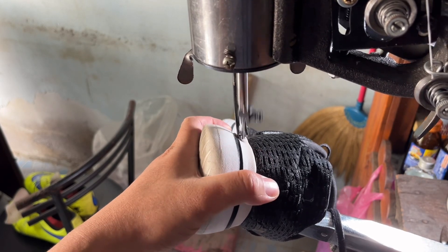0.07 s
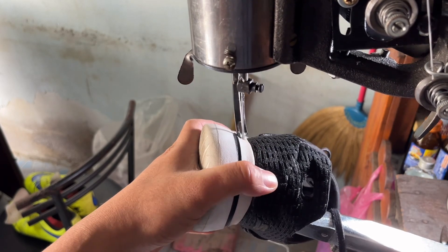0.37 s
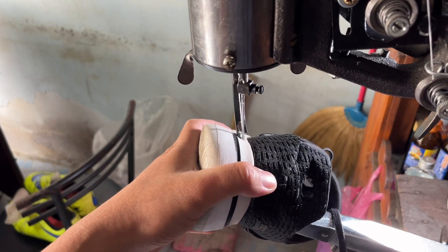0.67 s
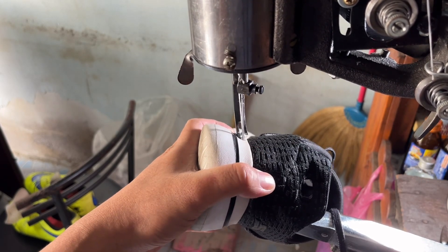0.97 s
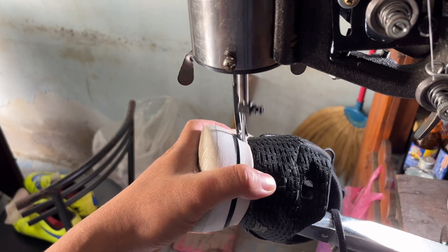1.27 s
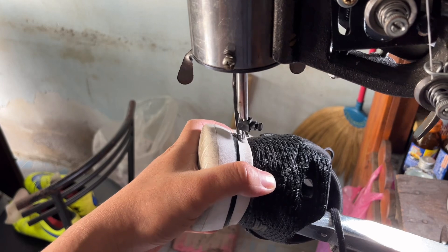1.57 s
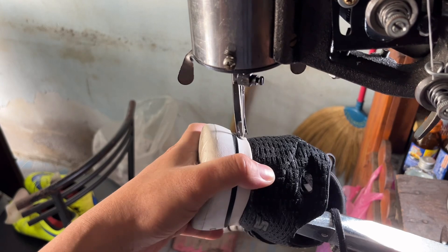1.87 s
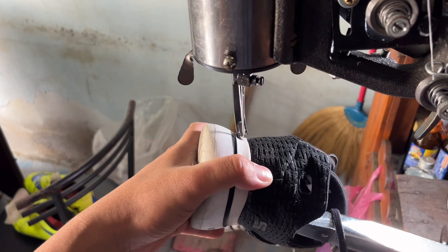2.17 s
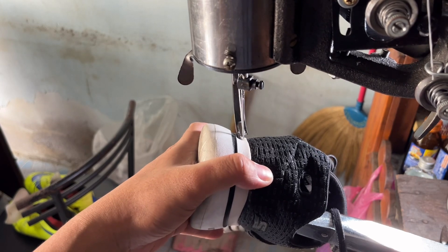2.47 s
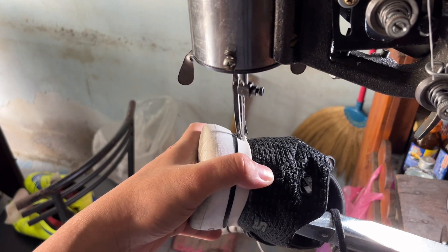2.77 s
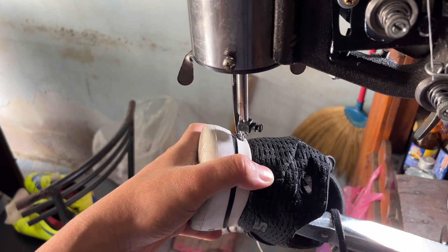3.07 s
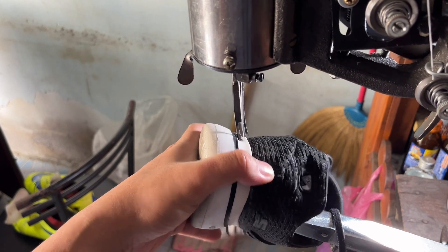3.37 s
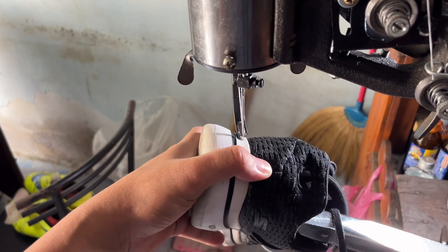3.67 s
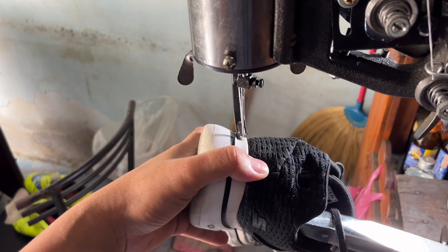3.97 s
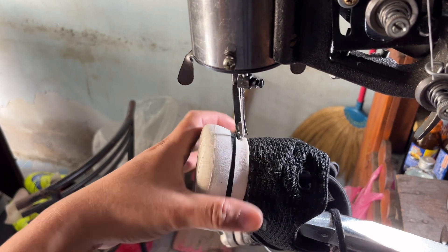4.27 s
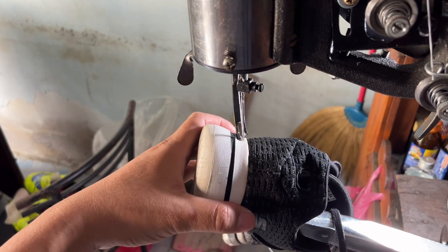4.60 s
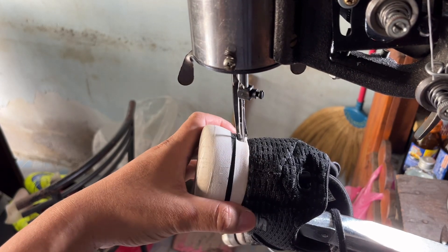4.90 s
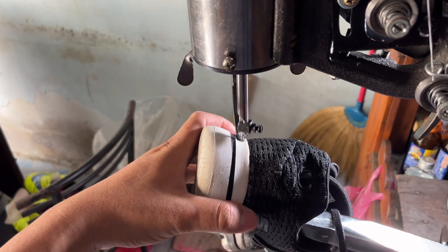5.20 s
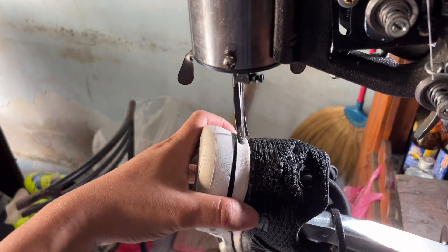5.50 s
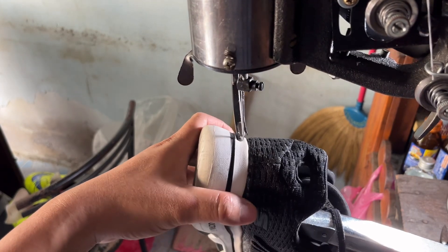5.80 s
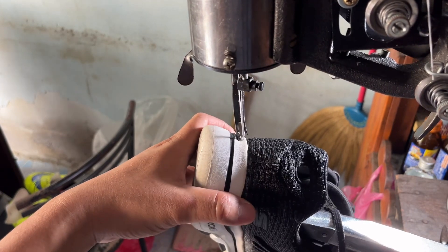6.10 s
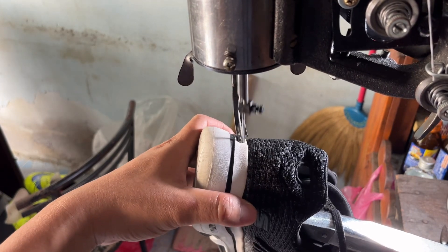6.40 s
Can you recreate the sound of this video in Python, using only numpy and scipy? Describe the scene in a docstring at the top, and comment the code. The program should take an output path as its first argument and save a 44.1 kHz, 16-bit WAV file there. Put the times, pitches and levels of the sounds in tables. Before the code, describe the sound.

A heavy sewing machine clacks through a shoe one slow stitch at a time, with small squeaks and faint traffic rumbling outside.

```python
"""Steel slides and squeaks, a lever snaps, a foot clacks down: a heavy cobbler's sewing machine,
close to the microphone in a small workshop, is turned by hand through a shoe, one stitch at a time.
In each stitch the linkage takes up its slack and the needle bar strikes, rattles and slides back.
The iron frame colours it all, the bench thumps, and fingers shift on the shoe between stitches.
Farther off, out in the street, traffic rumbles and an engine draws near."""
import sys
import numpy as np
from scipy import signal
from scipy.fft import rfft, irfft, next_fast_len
from scipy.io import wavfile
from scipy.ndimage import uniform_filter1d, map_coordinates

SR = 44100
rng = np.random.default_rng(int(sys.argv[2]) if len(sys.argv) > 2 else 0)


def wav_out(sig):
    """Save sig, one row per channel (or a flat mono array), as 16-bit PCM at SR to the path in sys.argv[1]."""
    wavfile.write(sys.argv[1], SR, np.round(np.clip(np.atleast_2d(sig).T, -1, 1) * 32767).astype(np.int16))


N = 293265

# One row a stitch: t/s of the needle bar's blow, run-up length/usual length, lever delay/s, foot delay/s,
# foot level/dB, foot's main ring f/Hz, its high ring level/dB, feed knock level/dB
STITCHES = [(-0.063, 1.7, 0.2435, 0.2963, -21, 4915, -5, -24.5),
            (1.4858, 0.965, 0.2428, 0.31, -45, 5480, 1, -25),
            (3.1288, 1.058, 0.24, 0.2977, -20.5, 5200, -11, -21.5),
            (5.2971, 1.057, 0.2432, 0.3022, -20, 5512, 12, -22.5),
            (6.6271, 0.972, 0.29, 0.24, -19, 5380, 0, -25)]
# Ring of the needle bar and linkage: f/Hz, level/dB, t60/s
BAR_MODES = [(1312, -12, .3), (2370, -10, .2), (2760, -7, .12), (3074, -10, .3), (3360, -7, .15),
             (3512, -8, .2), (3798, -2, .1), (4080, -5, .16), (5380, -1, .4), (5510, -8, .25),
             (6234, -13, .15), (7950, -7, .18), (11290, -11, .15), (12241, -14, .2)]
# Spectrum of a light steel contact: f/Hz, level/dB
TICK_COLOUR = [(300, -32), (700, -44), (2000, -3.5), (3500, -4), (5300, 2), (7500, -6), (11300, 3),
               (14000, 5.5), (16000, -17)]
# Stereo image of diffuse sound at the microphone: f/Hz, left-right likeness
DIFFUSE = [(60, 0.98), (130, 0.9), (290, 0.76), (640, -0.17), (1410, -0.29), (3100, 0.57), (6820, -0.099),
           (15000, 0.073)]


def needle_bar():
    """The bar strikes once a stitch, then rebounds and rattles as it drives through the sole."""
    colour = [(100, -26), (300, -13.5), (600, 12), (1000, 0.5), (1900, -1.5), (2700, 3), (3800, 4.5),
              (4600, 0), (6400, -1.5), (8400, -5), (10000, -6), (13500, -3), (15500, -34)]  # the crack: f/Hz, level/dB
    rebounds = [(1.5028, -15, 0.5), (1.5138, -17.5, -1.5), (1.5186, -15.5, -2), (1.528, -20.5, 5),
                (3.1457, -18, -2.5), (3.1575, -21.5, -6), (3.171, -28, 4), (5.3135, -18.5, -2),
                (5.326, -23, -2), (5.338, -25, 5.5), (6.6445, -16.5, 5)]  # t/s, level/dB, hardness/dB
    loaded_modes = [(2410, -7, .1), (2756, -4, .11), (3380, -8, .1), (3580, -6, .09), (3800, 0, .13),
                    (3875, -1, .12), (3945, -3, .09), (5400, -6, .12), (7150, -7, .07), (7950, -7, .08),
                    (11250, -8, .07)]  # the bar's ring under load: f/Hz, level/dB, t60/s
    blows = [(s, -17, 0) for s, *_ in STITCHES]  # t/s, level/dB, hardness/dB
    out = strikes(blows, colour, BAR_MODES,
                  tip_db=2.5, crack_t60=0.029, rattle_db=-14, rattle_t60=0.23, ring_db=-18)
    return out + strikes(rebounds, colour, loaded_modes,
                         tip_db=-7.5, crack_t60=0.017, rattle_db=-14, rattle_t60=0.13, ring_db=-10)


def feed_lever():
    """The feed lever snaps over once the needle is out."""
    colour = [(300, -26), (1500, 1), (3000, 4), (4200, 9.5), (5500, 6), (6600, 6.5), (8400, 3.5),
              (11600, 9.5), (14000, 9.5), (16000, -15)]  # the snap: f/Hz, level/dB
    modes = [(2080, -6, .035), (4310, -9, .02), (6200, -3, .022), (6310, -2, .025), (6900, -5, .025),
             (9290, -7, .03), (10300, -5, .03), (11550, 0, .035), (13020, -14, .1)]  # the lever's ring: f/Hz, level/dB, t60/s
    snaps = [(s + delay, -15.5, -1.5) for s, _, delay, *_ in STITCHES]  # t/s, level/dB, hardness/dB
    return strikes(snaps, colour, modes,
                   tip_db=-5, crack_t60=0.012, rattle_db=-24.5, rattle_t60=0.19, ring_db=-3.5)


def presser_foot():
    """Each landing rings the foot a little differently and shakes its spring; a softer bounce follows."""
    colour = [(200, -0.5), (600, -0.5), (1100, 0), (2200, 1), (3500, 0), (5200, 4.5), (6700, -2.5),
              (8400, -7), (11500, -1), (14000, -2), (15500, -49.5)]  # the clack: f/Hz, level/dB
    foot_modes = [(2045, 14.5, 0.078), (3376, 14.5, 0.069), (3614, 0, 0.071), (4046, 4, 0.094),
                  (4750, 10, .1), (5030, 1, .15), (5470, -3, 0.22), (6200, 8, 0.078), (7950, 2, 0.054),
                  (9367, -5, 0.056), (10100, -5, 0.25), (11800, 4, 0.2), (12620, -2, .09),
                  (13500, 8, 0.063)]  # the foot's ring: f/Hz, level/dB, t60/s
    spring_modes = [(3066, -9.5, .5), (3080, -9.5, .5), (10846, -20, .7)]  # its spring rings on: f/Hz, level/dB, t60/s
    out = np.zeros((2, N))
    for blow, _, _, delay, db, main_hz, high_db, _ in STITCHES:
        landing = blow + delay
        contacts = [(landing, db, 3), (landing + 0.017, db - 13.5, -7)]  # t/s, level/dB, hardness/dB
        modes = foot_modes + spring_modes + [(main_hz, 17, 0.1), (11300, high_db, 0.11)]
        out += strikes(contacts, colour, modes,
                       tip_db=-1.5, crack_t60=0.051, rattle_db=-10, rattle_t60=0.094, ring_db=-1.5)
    return out


def linkage():
    """The linkage ticks lightly and catches just before each blow; loose parts tick now and then."""
    ticks = [(-0.191, -52.5, 4), (0.196, -30.5, -5)]  # in every stitch: t/s from the blow, level/dB, hardness/dB
    stray_ticks = [(0.042, -38, -3.5), (0.382, -44.5, -3.5), (1.23, -50.5, 0), (1.619, -34, -7.5),
                   (1.805, -38, -29), (2.7475, -43.5, -4), (2.853, -53, -4), (3.2683, -26, -7),
                   (4.6338, -46, -6), (4.974, -50, 0), (5.456, -29.5, -2), (6.268, -52.5, 1),
                   (6.398, -52, 1.5)]  # loose parts: t/s, level/dB, hardness/dB
    catches = each_stitch([(-0.0843, -21.5, -7)])  # columns as for ticks
    out = strikes(each_stitch(ticks) + stray_ticks, TICK_COLOUR, BAR_MODES,
                  tip_db=-4, crack_t60=0.019, rattle_db=-10, rattle_t60=0.084, ring_db=-18)
    return out + strikes(catches, TICK_COLOUR, BAR_MODES,
                         tip_db=1, crack_t60=0.015, rattle_db=-14.5, rattle_t60=0.14, ring_db=-21)


def strikes(rows, colour, modes, tip_db, crack_t60, rattle_db, rattle_t60, ring_db):
    """Steel meets steel: a bright tip, a crack, a chatter of loose joints and the part's ring."""
    contact_s, tip_t60 = 0.00039, 0.013
    tilt = [(4000, -0.45), (10000, 1.0)]  # harder contact, more treble: f/Hz, dB per dB of hardness
    out, t = np.zeros((2, N)), np.arange(SR // 2) / SR
    for s, db, hardness_db in rows:
        chatter = amp(6.4 * unit(uniform_filter1d(rng.standard_normal(len(t)), size=60)))
        fall = amp(-60 * t / crack_t60) + amp(rattle_db - 60 * t / rattle_t60) * chatter
        hit = fall * close(noise(len(t)), colour) + amp(ring_db) * ring(modes, t)
        hit = filtered(hit, lambda hz: amp(hardness_db * along(tilt, hz)))
        tip = amp(tip_db - 60 * t / tip_t60) * close(noise(len(t)), TICK_COLOUR)
        add(out, s, amp(db) * (hit + tip) * (1 - np.exp(-t / contact_s)))
    return out


def ring(modes, t, scatter_db=5):
    """Damped modes, at new strengths for each hit; each reaches the two channels in its own phase."""
    hz, db, t60 = np.transpose(modes)[:, :, None]
    size = amp(db + scatter_db * rng.standard_normal(hz.shape))
    phase = rng.uniform(0, 2 * np.pi, hz.shape)
    phase = phase + np.array([-1, 1])[:, None, None] * rng.uniform(-np.pi / 5, np.pi / 5, hz.shape)
    partials = size * amp(-60 * t / t60) * np.sin(2 * np.pi * hz * t + phase)
    return partials.sum(axis=1) / np.linalg.norm(size)


def knocks(swell_s, t60, roughness, overtone_db):
    """The arm and the shoe give way under each push with a few low cycles that glide in pitch."""
    pushes = [(-0.13, -35, 674, -12), (0.001, -27.5, 465, 7), (0.038, -28.5, 499, -13),
              (0.053, -30, 214, 0)]  # arm and shoe: t/s from the blow, level/dB, f/Hz, glide/(octaves/s)
    punches = [(1.497, -19, 564, 7), (1.509, -20, 606, -4.5), (1.53, -21.5, 702.6, -9.5),
               (3.14, -18, 542, 8), (3.163, -23, 570, -7), (5.307, -19.5, 530, 9.5),
               (6.639, -22.5, 530, 19)]  # the needle breaks through: t/s, level/dB, f/Hz, glide/(octaves/s)
    sag = -19.5  # octaves/s, as the shoe is shoved on or struck by the foot
    feed = [(s + 0.26, db, 425, sag) for s, *_, db in STITCHES]
    under_foot = [(s + delay + 0.019, -16.5 + 0.33 * db, 449, sag) for s, _, _, delay, db, *_ in STITCHES]
    colour = [(60, -14), (150, -12.5), (400, -3), (700, -10.5), (1200, -18), (4000, -25.5), (12000, -91)]
    out, t = np.zeros((2, N)), np.arange(SR // 4) / SR
    shape = (1 - np.exp(-(t / swell_s) ** 2)) * amp(-60 * t / t60)
    for s, db, hz, glide in each_stitch(pushes) + punches + feed + under_foot:
        thud = close(noise(len(t)), colour)
        phase = 2 * np.pi * np.cumsum(hz * 2 ** (glide * t)) / SR
        tone = np.sin(phase) + amp(overtone_db) * np.sin(2.1 * phase)
        add(out, s, amp(db) * shape / shape.max() * (tone + roughness * thud))
    return out


def sliding(judder_db, grain_db, groan_db, groan_width_hz):
    """Bars and cams slide in tiny slips that scrape and hiss; under load the drive groans and judders."""
    scrape_colour = [(150, -22), (700, 8), (950, -12), (1280, -10), (1600, -25), (1870, 6), (2200, -1.5),
                     (3100, 8.5), (4100, 3), (4600, 2), (5400, 1.5), (7200, -4), (9000, -30), (15000, -48)]  # f/Hz, level/dB
    hiss_colour = [(4000, -49), (6500, -19), (8000, -23), (9500, -12.5), (11000, -5), (13800, -8.5),
                   (15500, -41)]  # f/Hz, level/dB
    groan_colour = [(100, 10), (500, -9.5), (850, -0.5), (1100, -14)]
    judder_colour = [(80, -12), (180, -3), (330, 1), (600, 1.5), (950, -7), (1300, 5), (1700, -5.5),
                     (2600, -11), (5000, -58), (12000, -55)]
    scrape_gain, hiss_gain, load, groan_hz = strokes(attack_s=0.0159, release_s=0.035)
    catching_db = 2.6 * wobble(110)
    slips = amp(grain_db * wobble(900) + catching_db)
    scrape = scrape_gain * close(slips * noise(N), scrape_colour)
    hiss = hiss_gain * close(slips * noise(N), hiss_colour)
    groan = close(narrow(groan_hz, groan_width_hz), groan_colour)
    judder = close(slips * noise(N), judder_colour)
    return scrape + hiss + load * (amp(groan_db) * groan + amp(judder_db) * judder)


def strokes(attack_s, release_s):
    """Each stroke sets in, holds and lets go: gains of scrape, hiss and groan, and the groan's pitch."""
    # Wheel starts, slack goes, needle drops, pierces, slides back, thread tightens, shoe feeds, foot
    # settles: start t/s and end t/s from the blow, scrape/dB, hiss/dB, groan/dB, groan f/Hz
    cycle = [ (-0.19, -0.154, -56, -60, -45.5, 540), (-0.125, -0.1, -49.5, -63, -36, 640),
             (-0.073, -0.028, -35.5, -41, -29, 613), (0.022, 0.048, -33, -37.5, -24.5, 589),
             (0.073, 0.127, -35.5, -43, -30, 590.8), (0.152, 0.206, -43.5, -53, -26.5, 630),
             (0.244, 0.277, -51, -60, -31.5, 448.2), (0.3, 0.324, -44.5, -80, -28.5, 457.5), ]
    t, gates = np.arange(N) / SR, []
    for begin, end, *_ in cycle:
        corners = [(begin - attack_s, 0), (begin, 1), (end, 1), (end + release_s, 0)]
        gates.append(np.interp(t, *np.transpose(each_stitch(corners))))
    gates, table = np.array(gates) + 1e-6, np.array(cycle)
    scrape, hiss, groan = np.sqrt(amp(table[:, 2:5].T) ** 2 @ gates ** 2)  # overlaps add in power
    return scrape, hiss, groan, table[:, 5] @ gates / gates.sum(axis=0)


def squeaks():
    """Dry bearings and thread stick and slip in brief squeals, some rising in pitch."""
    # t/s from the blow, half length/s, f/Hz, level/dB, rise/(share of the pitch/s), width/Hz
    squeals = [(-0.165, 0.03, 3270, -50, 1.7, 90), (-0.115, 0.036, 3570, -49.5, -0.1, 75),
               (0.128, 0.013, 2760, -42.5, 0, 130), (0.18, 0.035, 3078, -43, -0.1, 60),
               (0.271, 0.007, 3274, -37, 9, 220.1)]
    colour = [(1000, -24), (2600, 5), (4000, -10), (8000, -29)]
    out, t = np.zeros((2, N)), np.arange(SR // 5) / SR
    middle = t[-1] / 2
    for s, half, hz, db, rise, width_hz in each_stitch(squeals):
        squeal = close(narrow(hz * (1 + rise * (t - middle)), width_hz), colour)
        add(out, s - middle, amp(db) * np.exp(-((t - middle) / half) ** 2) * squeal)
    return out


def iron_frame(x, fittings_db, fittings_t60):
    """The frame adds its resonances to the direct sound; screws, springs and covers add weak ones."""
    resonances = [(370, 36, 1.5), (491, 76, 1), (583.6, 6.3, 1.5), (740, 41, -6.5), (807, 39.5, -4.5),
                  (868, 16.7, 6), (1010, 12, 0), (1227, 17, 1.5), (1402, 31, -8), (1880, 100, -3.5),
                  (2434, 25, -7.5), (2780, 75, -1.5), (3280, 59, -4), (3484, 42, 2), (1310, 20, 3),
                  (3074, 17, 6), (3830, 110, 0), (5375, 45, 3.5), (5510, 40, -4), (7950, 110, 3),
                  (10846, 25, 3), (11260, 70, -1), (4140, 70, -3), (6950, 540, -3), (9220, 260, 4.5),
                  (9280, 320, 7), (12500, 38, -10.5)]  # iron frame and steel rods: f/Hz, width/Hz, level/dB
    body = filtered(x, lambda f: 1 + sum(amp(db) * 1j * f * width / (hz * hz - f * f + 1j * f * width)
                                         for hz, width, db in resonances))
    pitches = np.linspace(1500, 14000, num=60) + 70 * rng.standard_normal(60)
    fittings = ring([(hz, 0, fittings_t60) for hz in pitches], np.arange(SR // 4) / SR)
    shaken = signal.fftconvolve(x, fittings / np.linalg.norm(fittings[0]), axes=1)[:, :N]
    return body + amp(fittings_db) * shaken


def bench(swell_s):
    """The heaviest pushes shake the wooden bench a moment later."""
    thumps = [(0.043, -27.5), (0.32, -32.5)]  # t/s from the blow, level/dB
    colour = [(40, -4.5), (70, -3.5), (170, 2), (240, -3.5), (400, -7), (1000, -81)]
    out, t = np.zeros((2, N)), np.arange(SR // 4) / SR
    for s, db in each_stitch(thumps):
        boom = close(noise(len(t)), colour)
        add(out, s, amp(db) * t / swell_s * np.exp(1 - t / swell_s) * boom)
    return out


def off_centre(x):
    """The machine stands a little right of the microphone: the channels differ in level and phase."""
    lean = [(270, -0.5), (450, 0.5), (740, 1.5), (1220, -4.5), (2010, 4.5), (3330, 1.5), (5500, 1),
            (9000, -0.5), (13000, 0)]  # f/Hz, left minus right level/dB
    lag = [(60, 0.5), (250, 0), (450, 0.47), (740, 1.31), (1050, 2), (1450, 1.5), (1950, 0.5), (2500, -0.2),
           (3100, -1.65), (4600, -1.1), (5700, 1.65), (7600, 0.5), (9650, 4.5), (10700, 7), (13100, 8),
           (15000, 10)]  # f/Hz, lag of the left channel/rad
    half = np.array([[.5], [-.5]])
    return filtered(x, lambda hz: amp(half * along(lean, hz)) * np.exp(-1j * half * along(lag, hz)))


def hand():
    """Fingers shift on the knitted upper, with a thin squeak or a broad rustle."""
    rubs = [(0.518, 0.035, 4170, 20, -54), (2.13, 0.02, 6100, 29, -63), (2.26, 0.022, 5560, 29, -60),
            (2.69, 0.06, 4500, 12, -59), (3.862, 0.069, 3000, 6, -51), (4.8, 0.1, 4300, 8, -58)]  # t/s, half length/s, f/Hz, fall half an octave away/dB, level/dB
    t, out = np.arange(N) / SR, np.zeros((2, N))
    for s, half, hz, fall_db, db in rubs:
        band = [(hz / 4, -4 * fall_db), (hz / np.sqrt(2), -fall_db), (hz, 0),
                (hz * np.sqrt(2), -fall_db), (hz * 2, -3 * fall_db), (hz * 4, -120)]
        out += amp(db) * np.exp(-((t - s) / half) ** 2) * spread(noise(N), band, DIFFUSE)
    return out


def workshop(x):
    """The small room answers 5 ms after the direct sound, its treble dying first."""
    decay = [(150, 0.41), (1000, 0.41), (4000, 0.3), (12000, 0.22)]  # reverberation: f/Hz, t60/s
    hz, t, spectrum = signal.stft(noise(SR // 2), SR, nperseg=256)
    tail = signal.istft(spectrum * amp(-60 * t / along(decay, hz)[:, None]), SR, nperseg=256)[1]
    late = np.pad(x, ((0, 0), (SR // 200, 0)))
    return signal.fftconvolve(late, tail / np.linalg.norm(tail[0]), axes=1)[:, :N]


def engine():
    """Outside, an engine slows as it draws near; a second exhaust note joins at the end."""
    firing = [(4.4, 62.13, -35), (5.0, 53.5, -43), (5.25, 49.94, -32), (5.62, 46.53, -25.5),
              (6.1, 44.27, -34), (6.65, 42.6, -38)]  # t/s, firing f/Hz, level/dB
    orders = [(1, 3.5), (2, -11.5), (3, -17), (5, -16.5)]  # multiple of the firing rate, level/dB
    drone = [(6.08, 109.6, -34), (6.5, 108.9, -26), (6.65, 106.4, -30.5)]  # the second note: t/s, f/Hz, level/dB
    return exhaust(firing, orders, unsteady_db=1.5) + exhaust(drone, [(1, 0.5), (2, -21)], unsteady_db=3.5)


def exhaust(rows, orders, unsteady_db, fade_s=0.17):
    """A wavering exhaust note at a distance: only its low orders come indoors."""
    t = np.arange(N) / SR
    hz, db = curves(rows)
    phase = 2 * np.pi * np.cumsum(hz * (1 + 0.0086 * wobble(9))) / SR
    gate = np.clip(1 + np.minimum(t - rows[0][0], rows[-1][0] - t) / fade_s, 0, 1)
    return gate * sum(amp(db + level + unsteady_db * wobble(7.8)) * np.sin(k * phase)
                      for k, level in orders)


def traffic(rumble_sway_db, wash_sway_db):
    """The street heard from indoors: a rumble and a soft wash that slowly build."""
    levels = [(0, -38, -43), (2.2, -38.5, -42.5), (3.9, -35.5, -40), (6.65, -30.5, -38)]  # t/s, rumble level/dB, wash level/dB
    rumble_colour = [(12, -77.5), (20, -75), (29, -24.5), (40, -5.5), (59, 1), (113, -6.5), (172, -13.5),
                     (226, -12.5), (268, -20.5), (300, -20.5), (390, -48), (660, -120)]  # f/Hz, level/dB
    wash_colour = [(120, -13.5), (200, -4.5), (260, -9), (400, -7.5), (600, -9), (1200, -15.5),
                   (1550, -18.5), (1750, -20), (3000, -27), (4350, -30), (6000, -34.5), (8300, -52.5),
                   (10500, -39.5), (13800, -48.5), (15500, -79)]  # f/Hz, level/dB
    rumble_db, wash_db = curves(levels)
    rumble = amp(rumble_db + rumble_sway_db * wobble(9)) * spread(noise(N), rumble_colour, DIFFUSE)
    wash = amp(wash_db + wash_sway_db * wobble(2.52)) * spread(noise(N), wash_colour, DIFFUSE)
    return rumble + wash


def each_stitch(rows):
    """Repeat the cycle's events in every stitch; the run-up to the blow goes at the pace of the hand."""
    return [(s + after * (run_up if after < 0 else 1), *rest)
            for s, run_up, *_ in STITCHES for after, *rest in rows]


def close(pair, colour):
    """A source right in front of the microphone: the channels are much alike."""
    likeness = [(60, 1), (200, 0.95), (450, 0.88), (740, 0.9), (1300, 0.6), (2400, 0.62), (4400, 0.26),
                (8000, 1), (13000, 1)]  # f/Hz, left-right likeness
    return spread(pair, colour, likeness)


def spread(pair, colour, likeness):
    """Two unrelated signals become stereo of rms 1, with a colour of (f/Hz, level/dB) points."""
    def response(hz):
        angle = np.arccos(np.clip(along(likeness, hz), -1, 1)) / 2
        return amp(along(colour, hz)) * [np.cos(angle), np.sin(angle)]
    mid, side = filtered(pair, response)
    return unit(np.array([mid + side, mid - side]))


def narrow(centre_hz, width_hz):
    """Two noises in a narrow resonance whose centre may move."""
    band = filtered(rng.standard_normal((2, 2, len(centre_hz))), lambda hz: 1 / (1 + (hz / width_hz) ** 2))
    phase = 2 * np.pi * np.cumsum(centre_hz) / SR
    return band[0] * np.cos(phase) + band[1] * np.sin(phase)


def noise(n):
    """Two unrelated white noises."""
    return rng.standard_normal((2, n))


def wobble(rate):
    """A smooth random curve, rate knots a second."""
    return map_coordinates(rng.standard_normal(int(N * rate / SR) + 4), [np.arange(N) * rate / SR])


def amp(db):
    """Decibels to gain."""
    return 10 ** (np.asarray(db) / 20)


def unit(x):
    """Scale to rms 1."""
    return x / np.sqrt(np.mean(x ** 2) + 1e-20)


def along(points, hz):
    """Interpolate (f/Hz, value) points on a log axis."""
    f, values = np.transpose(points)
    return np.interp(np.log(hz + 1), np.log(f + 1), values)


def curves(rows):
    """One value per sample for each column after the time."""
    s, *columns = np.transpose(rows)
    return [np.interp(np.arange(N) / SR, s, column) for column in columns]


def filtered(x, response):
    """Multiply the spectrum of x by a function of frequency."""
    n = x.shape[-1]
    size = next_fast_len(n + SR // 4)
    return irfft(rfft(x, size) * response(np.fft.rfftfreq(size, 1 / SR)), size)[..., :n]


def add(track, s, sound):
    """Mix a sound in at time s."""
    start = round(s * SR)
    sound = sound[..., max(-start, 0):]
    part = track[:, max(start, 0):][:, :sound.shape[-1]]
    part += sound[..., :part.shape[-1]]


def scene():
    """The machine close up, the workshop around it, the street beyond."""
    parts = linkage() + needle_bar() + feed_lever() + presser_foot()
    parts += knocks(swell_s=0.0047, t60=0.043, roughness=0.53, overtone_db=-13)
    parts += sliding(judder_db=-9, grain_db=1, groan_db=-5, groan_width_hz=125)
    parts += squeaks()
    machine = off_centre(iron_frame(parts, fittings_db=-5, fittings_t60=0.017) + bench(swell_s=0.017))
    indoors = machine + amp(-13) * workshop(machine) + hand()
    return indoors + traffic(rumble_sway_db=1.96 * -1, wash_sway_db=2.5) + engine()


def record(dry):
    """The microphone sheds the deepest bass and keeps nothing above its band limit."""
    bass_cut, top_hz = [(20, -14), (31, -12), (40, 0)], 16300
    return filtered(dry, lambda hz: (hz < top_hz) * amp(along(bass_cut, hz)))


dry = scene()
out = record(dry)
wav_out(out)
```